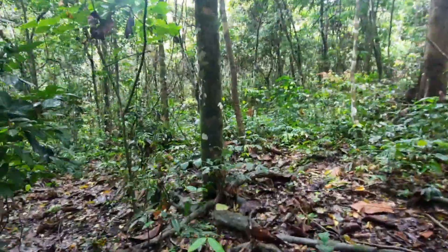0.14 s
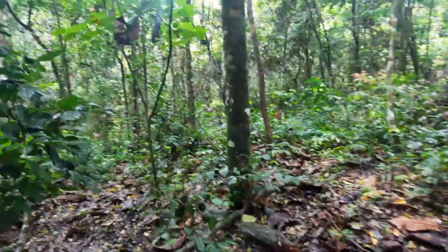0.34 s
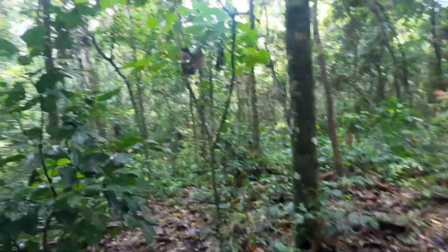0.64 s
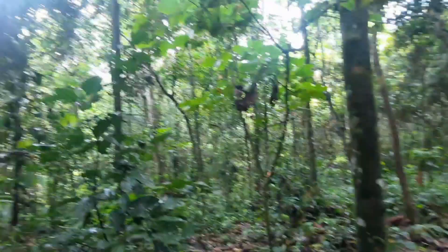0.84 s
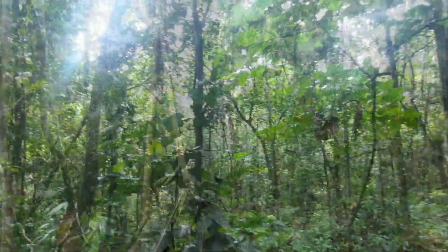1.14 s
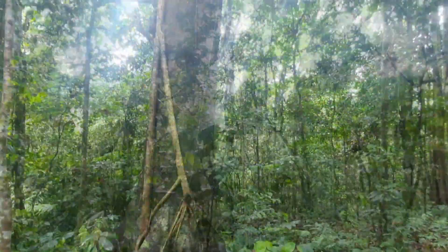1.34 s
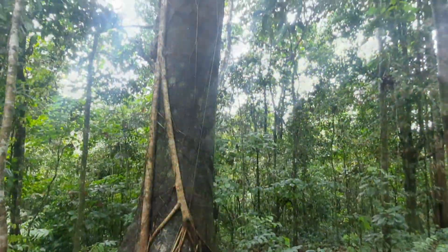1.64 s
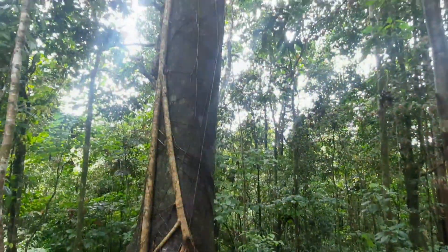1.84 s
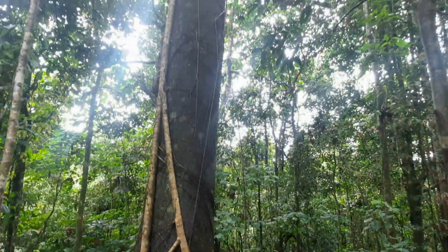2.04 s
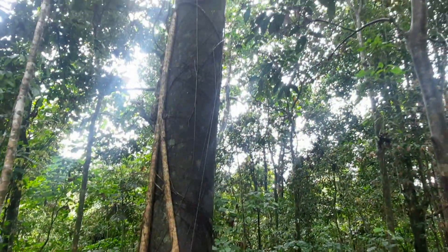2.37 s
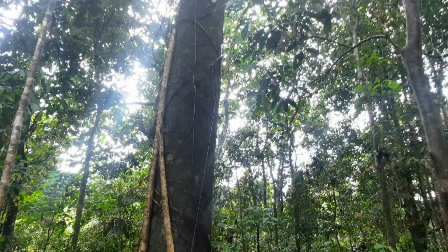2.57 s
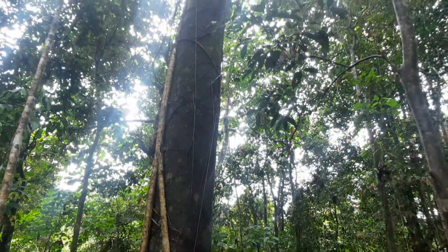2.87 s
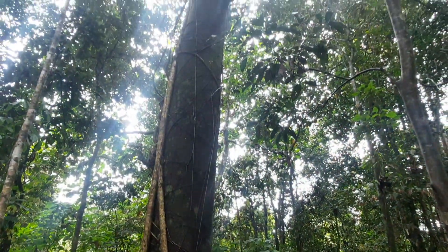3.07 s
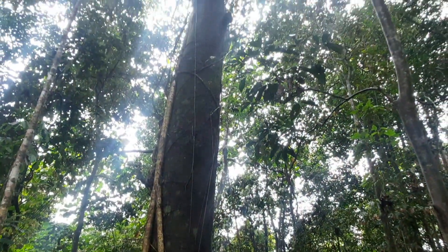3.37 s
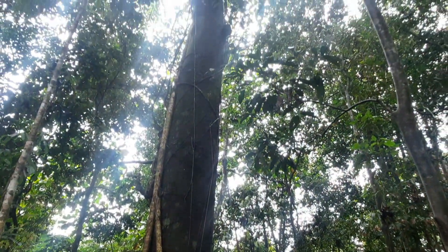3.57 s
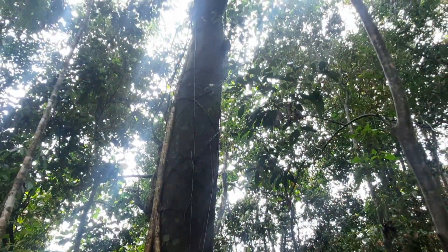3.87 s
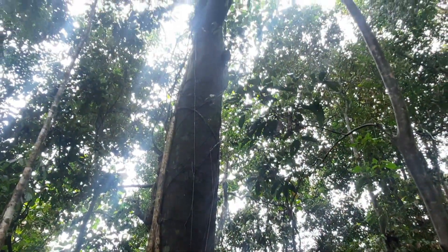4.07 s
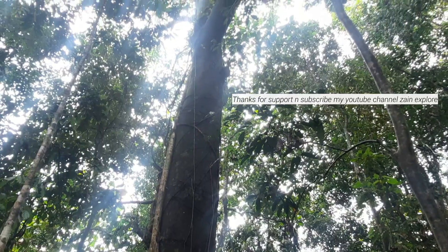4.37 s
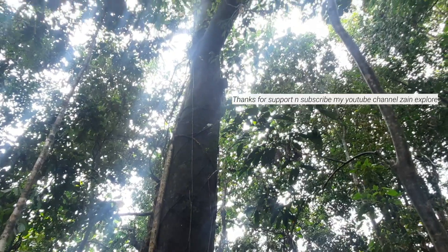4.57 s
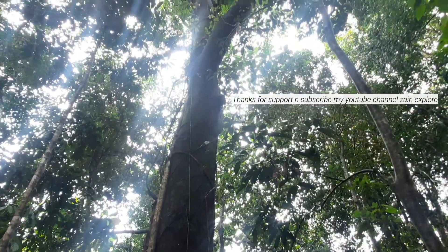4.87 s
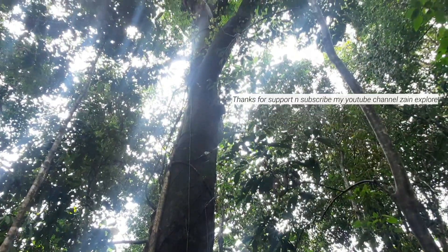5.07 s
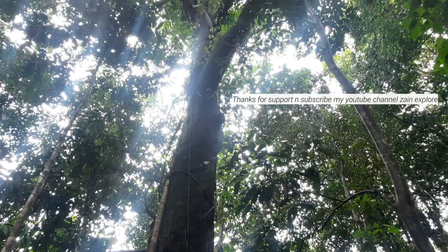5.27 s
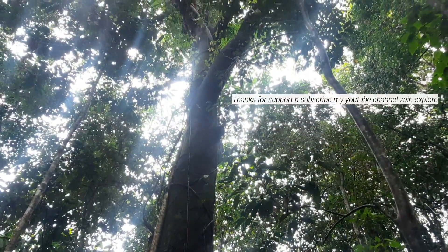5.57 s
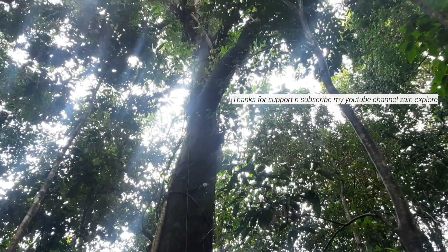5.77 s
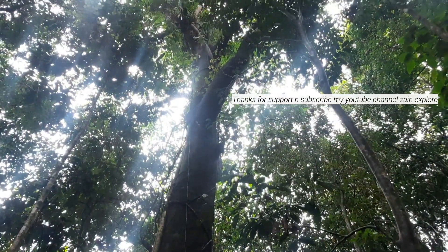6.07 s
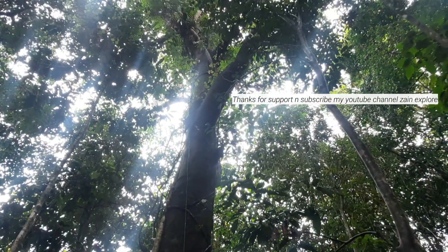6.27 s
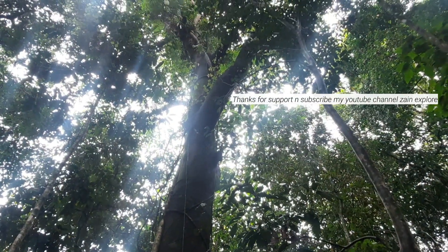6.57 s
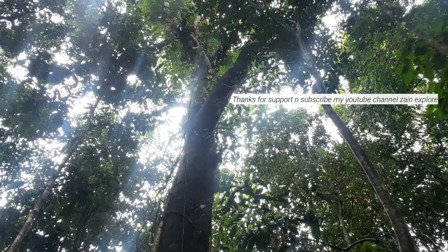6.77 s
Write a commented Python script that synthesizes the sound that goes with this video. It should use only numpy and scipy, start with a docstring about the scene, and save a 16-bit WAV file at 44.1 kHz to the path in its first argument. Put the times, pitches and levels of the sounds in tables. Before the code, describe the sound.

A dense tropical forest insect chorus fills both sides: a wavering whistle near 3 kHz, buzzing cicadas and a pulsing high sizzle. Steps crunch dry leaves close by in the first half second or so, then a hand bumps the left microphone with a dull, low thump and rub. The chorus dips for about a second and returns with a closer cicada on the right, over very faint ticks.

```python
"""A tropical forest drones from the start: a crowd of wavering sines whistles near 3 kHz, resonant noise makes
buzzing cicadas, and a high noise sizzle swells and ebbs over a faint rumble. In the first half second steps
crunch in the leaf litter as short bursts of grainy noise; near 1 s a hand bumps the left microphone, with clicks
ringing the case and low noise for the rub. The chorus dips for about a second while its balance shifts: the
nearest cicada comes forward on the right. The drone goes on with a few faint ticks in the undergrowth."""
import sys
import numpy as np
from scipy import signal
from scipy.fft import rfft, irfft, next_fast_len
from scipy.io import wavfile
from scipy.ndimage import uniform_filter1d

SR = 44100
rng = np.random.default_rng(int(sys.argv[2]) if len(sys.argv) > 2 else 0)


def dump(signal):
    """Clip the signal to [-1, 1] and save it as 16-bit WAV at the path in sys.argv[1]."""
    limited = np.clip(np.atleast_2d(signal).T, -1, 1)
    pcm = np.round(limited * 32767).astype(np.int16)
    wavfile.write(sys.argv[1], SR, pcm)


N = 304731
TIME = np.arange(N) / SR   # [s]

# Colour of the distant rumble: (frequency [Hz], relative density [dB per Hz])
AIR_SPECTRUM = [(25, -13), (60, -3.5), (120, 2), (210, -6), (350, 0.5), (520, -10.5), (900, -14),
                (1600, -20.5), (3000, -29.5)]
# Soft swells of the rumble: (crest time [s], width [s], level before the chorus swing [dB])
AIR_SWELLS = [(2.88, 0.18, -62), (3.7, 0.95, -65.5), (4.97, 0.23, -63.5), (5.35, 0.87, -67.5)]
# Colour of brushed leaves: (frequency [Hz], relative density [dB per Hz])
LEAF_SPECTRUM = [(50, -14), (130, -7.5), (210, -13), (320, 2), (550, -1.5), (800, -3.5), (1300, -3.5),
                 (2200, -5), (5000, -9), (11000, -14), (15000, -23.5)]
# Feet and clothes brushing the leaves: (time [s], length [s], level [dB])
BRUSHES = [(0.0, .025, -37), (0.17, 0.12, -48), (0.441, 0.14, -34), (0.603, 0.089, -33)]
# Footfalls and small stirrings in the litter: (time [s], level [dB], pitch [Hz], T60 decay [s])
TREADS = [(0.003, -37.5, 1030, 0.11), (0.168, -40, 800, 0.06), (0.238, -39, 377, 0.15),
          (0.364, -25, 422, 0.036), (0.385, -43, 160, 0.13), (0.474, -28.5, 374, .15),
          (0.487, -22.5, 383, 0.18), (0.5, -30.5, 890, 0.41), (0.534, -26, 506, 0.23),
          (0.679, -34, 910, 0.12), (0.898, -47, 544, 0.95), (1.071, -41.5, 994, 0.12),
          (2.697, -58, 1010, 0.23), (2.788, -53, 1160, 0.095), (3.167, -49, 1400, 0.096),
          (3.69, -52.5, 564, 0.19), (4.89, -53, 1420, 0.068), (4.983, -48, 1500, 0.13),
          (5.72, -59, 650, .08)]
# Hand knocks on the case: (time [s], relative force [dB], lowpass cut, lower is softer [Hz])
KNOCKS = [(0.949, -16.5, 251), (1.008, -7, 350), (1.019, 1, 303), (1.029, -2.5, 600), (1.044, -5, 456),
          (1.056, -8, 407.4), (1.086, -2, 230), (1.096, -1.5, 560), (1.109, -8.5, 307), (1.129, -10.5, 450),
          (1.201, -29, 150), (1.238, -30, 300), (1.303, -30, 300), (1.346, -27.5, 148)]
# Ringing modes of the case: (frequency [Hz], relative level [dB], T60 decay [s])
CASE_MODES = [(74, -14, 0.28), (134, -6.5, 0.04), (173, -4.5, 0.033), (273, -3.5, 0.036)]
# Colour of sliding skin: (frequency [Hz], relative density [dB per Hz])
RUB_SPECTRUM = [(20, -28.5), (45, -9.5), (85, 4.5), (130, -0.5), (220, -17), (450, -24.5), (800, -43),
                (2000, -75.5)]
# Colour of the sizzle in each ear: (frequency [Hz], relative density [dB per Hz])
SIZZLE_LEFT_SPECTRUM = [(7000, -35.5), (8500, -12), (9600, -6), (11300, 2), (12700, -6), (15000, -16)]
SIZZLE_RIGHT_SPECTRUM = [(8000, -30.5), (9800, -11.5), (10800, -4.5), (11700, 2), (13000, 0), (15000, -22)]
# Sizzle swells, about every 3/4 s: (crest time [s], width [s], level before the chorus swing [dB])
SIZZLE_SWELLS = [(0.1, .3, -41.5), (0.57, 0.34, -36.5), (1.0, .2, -40), (1.35, 0.26, -39.5),
                 (2.13, 0.28, -35), (2.84, 0.33, -35), (3.64, 0.64, -35.5), (4.501, 0.55, -36.5),
                 (5.28, 0.46, -35.5), (6.02, 0.34, -33.5), (6.73, 0.38, -33)]
# Colour of the blurred far insects: (frequency [Hz], relative density [dB per Hz])
FAR_INSECT_SPECTRUM = [(1000, -35), (1280, -26.5), (1500, -15.5), (1850, -13), (2080, -18.5), (2380, -4.5),
                       (2900, 1), (3900, -2), (6500, -2.5), (8000, -6.5), (11000, -6), (15000, -12.5)]
# Cicada song bands: (frequency [Hz], width before scaling [Hz], relative level [dB], left over right [dB])
CICADA_BANDS = [(2427, 88, -18, 2.5), (3618, 130, -18, 4.5), (4240, 100, -18.5, 0.5),
                (5384, 1810, -6.5, -7)]
# Lines of the nearest cicada: (frequency [Hz], width before scaling [Hz], relative level [dB])
NEAR_CICADA_LINES = [(5160, 12, -19), (5224, 8, -17), (5372, 12, -20), (5445, 30, -17), (5513, 9, -17),
                     (5598, 14, -18), (5680, 50, -12), (5762, 58, -4), (5830, 50, -9.5), (6093, 9, -21),
                     (6320, 10, -23)]
# Swing of the whole chorus, with its dip: (time [s], level change [dB])
CHORUS_LEVEL = [(0, -1.5), (0.62, -2), (0.98, -2.5), (1.17, -9.5), (1.65, -9.5), (2.0, -5), (2.45, -0.24),
                (3.25, -1), (4.0, -0.4), (5.3, -0.36), (6.91, -0.63)]

# Levels before the chorus swing
AIR_DB, SIZZLE_BED_DB = -69, -42.5   # between swells
WHISTLE_DB, CICADA_DB, NEAR_CICADA_DB = -25, -34, -32.5
WHISTLE_FOLLOWS, SIZZLE_FOLLOWS, AIR_FOLLOWS = 1, 0.85, 0.67   # shares of the chorus swing in dB

# The balance shifts: the nearest cicada comes forward and the sizzle moves toward the middle
SHIFT_START_S, SHIFT_END_S = 1.0, 1.9
NEAR_CICADA_BACK_DB = -8   # how much fainter it is before the shift
SIZZLE_BEFORE_SIDE_DB, SIZZLE_AFTER_SIDE_DB = 8.5, 1.5   # left over right

WHISTLE_HZ, WHISTLE_SPREAD_HZ, WHISTLE_WAVER_HZ = 3038, 28, 19   # centre, rms spread, rms waver

BRUSH_ATTACK_S, BRUSH_T60_S = 0.029, 0.18
STIR_DB, STIR_LENGTH_S, STIR_T60_S = -46, 1.16, 0.66   # faint stirring until the walker stands still
SETTLE_DB, SETTLE_LENGTH_S = -67, 1.84   # the leaves settle a little longer

# The hand presses on the case, slides ever more lightly and lets go
RUB_START_S, RUB_ATTACK_S, RUB_LENGTH_S, RUB_T60_S = 0.93, 0.025, 0.19, 0.56
RUB_DB = -20.5   # before the left-right split and low cut
LET_GO_S, LET_GO_T60_S = 1.4, 0.091


def from_db(db):
    """Decibels to gain."""
    return 10 ** (np.asarray(db) / 20)


def rms_one(x):
    """Scale to rms 1."""
    return x / np.sqrt(np.mean(x ** 2) + 1e-20)


def pan(side_db):
    """Left and right gains, side_db apart, with mean power 1."""
    return rms_one(from_db(np.array([[side_db], [-side_db]]) / 2))


def drift(rate):
    """Random wander with rms 1, joining chance values drawn rate times a second."""
    knots = rng.standard_normal(int(rate * N / SR) + 2)
    return rms_one(np.interp(TIME * rate, np.arange(len(knots)), knots))


def stereo_noise(alike):
    """White noise, of which the share alike (in power) is common to both ears."""
    common = rng.standard_normal(N)
    separate = rng.standard_normal((2, N))
    return np.sqrt(alike) * common + np.sqrt(1 - alike) * separate


def colour(x, spectrum):
    """Filter to a spectrum that falls away 12 dB per octave beyond its ends; rms 1."""
    size = next_fast_len(N)
    hz, db = np.transpose(spectrum)
    bins = np.maximum(np.arange(size // 2 + 1) * SR / size, 1)
    gain = from_db(np.interp(np.log(bins), np.log(hz), db))
    ends = np.minimum(1, np.minimum(bins / hz[0], hz[-1] / bins)) ** 2
    return rms_one(irfft(rfft(x, size) * gain * ends, size)[..., :N])


def resonate(x, hz, width):
    """A resonance with gain 1 on top, passed twice for steeper skirts."""
    r = np.exp(-np.pi * width / SR)
    top = np.array([1, 0, -1]) * (1 - r * r) / 2
    poles = [1, -2 * r * np.cos(2 * np.pi * hz / SR), r * r]
    return signal.lfilter(top, poles, signal.lfilter(top, poles, x))


def ring(x, hz, t60):
    """A unit click sets a decaying sine of about height 1 ringing."""
    r = np.exp(-np.log(1000) / (t60 * SR))
    w = 2 * np.pi * hz / SR
    return signal.lfilter([0, np.sin(w)], [1, -2 * r * np.cos(w), r * r], x + 1e-18)


def stroke(start, attack, length, t60):
    """An envelope that rises, holds until its length (attack included) is over and dies away."""
    age = TIME - start
    decay = np.exp(-np.log(1000) * np.clip((age - length) / t60, 0, 10))
    return np.clip(age / attack, 0, 1) * decay


def swell(crest, width, db):
    """Power of a bell-shaped swell, with its width taken at half power."""
    return from_db(db) ** 2 * 0.5 ** np.minimum((2 * (TIME - crest) / width) ** 2, 40)


def air():
    """Low coloured noise makes a faint, distant rumble with a few soft swells."""
    power = from_db(AIR_DB) ** 2 + sum(swell(*row) for row in AIR_SWELLS)
    return np.sqrt(power) * colour(stereo_noise(0.7), AIR_SPECTRUM) * pan(1.5)


def leaf_brushes(grain_db=3):
    """Dry leaves rub and crackle: grainy noise follows the motion of feet and clothes."""
    # the stirring is already under way at time 0
    motion = from_db(STIR_DB) * stroke(-BRUSH_ATTACK_S, BRUSH_ATTACK_S, STIR_LENGTH_S, STIR_T60_S)
    motion += from_db(SETTLE_DB) * stroke(0, BRUSH_ATTACK_S, SETTLE_LENGTH_S, STIR_T60_S)
    for start, length, db in BRUSHES:
        brush = from_db(db) * stroke(start, BRUSH_ATTACK_S, length, BRUSH_T60_S)
        motion = np.hypot(motion, brush)
    crackle = stereo_noise(0.6) * from_db(grain_db * drift(500))
    return colour(crackle, LEAF_SPECTRUM) * motion * pan(4.6)


def treads(grain_db=2):
    """Each footfall or stirring crushes leaves: a short burst of grainy noise with a broad pitch."""
    out = np.zeros((2, N))
    push = stereo_noise(1.0) * from_db(grain_db * drift(300))
    for start, db, hz, t60 in TREADS:
        crunch = rms_one(resonate(push, hz, 0.75 * hz))
        out += from_db(db) * stroke(start, 0.0018, 0, t60) * crunch * pan(2.5)
    return out


def case_knocks():
    """Softened clicks from the hand strike the case and ring its modes."""
    force = np.zeros(N)
    for start, db, cut_hz in KNOCKS:
        click = np.full(N, 1e-18)
        click[round(start * SR)] = from_db(db)
        force += signal.sosfilt(signal.butter(2, cut_hz, fs=SR, output="sos"), click)
    return sum(from_db(db) * ring(force, hz, t60) for hz, db, t60 in CASE_MODES)


def skin_rub():
    """Sliding skin makes low friction noise that follows its pressure and fades fast on letting go."""
    pressure = stroke(RUB_START_S, RUB_ATTACK_S, RUB_LENGTH_S, RUB_T60_S)
    touching = from_db(-60 * np.clip((TIME - LET_GO_S) / LET_GO_T60_S, 0, 2))
    friction = colour(rng.standard_normal((2, N)), RUB_SPECTRUM)
    return from_db(RUB_DB) * pressure * touching * friction


def hand_bump():
    """Knocks and rub reach almost only the left microphone, with the deepest bass cut."""
    thump = case_knocks() * from_db([[0], [-42]]) + skin_rub() * from_db([[0], [-23]])
    return signal.sosfilt(signal.butter(4, 50, "high", fs=SR, output="sos"), thump)


def sizzle(shifted):
    """Bush crickets rasp high up in regular swells; each microphone port colours the noise differently."""
    left, right = stereo_noise(0.013)
    rasp = np.array([colour(left, SIZZLE_LEFT_SPECTRUM), colour(right, SIZZLE_RIGHT_SPECTRUM)])
    power = from_db(SIZZLE_BED_DB) ** 2 + sum(swell(*row) for row in SIZZLE_SWELLS)
    side_db = SIZZLE_BEFORE_SIDE_DB * (1 - shifted) + SIZZLE_AFTER_SIDE_DB * shifted
    return np.sqrt(power) * rasp * from_db(np.array([side_db, -side_db]) / 2)


def cicadas(flutter_db=1.02):
    """Countless tymbal clicks merge into a fluttering buzz in each kind's resonance, over the far crowd."""
    out = from_db(-0.5) * colour(stereo_noise(0.03), FAR_INSECT_SPECTRUM)
    for hz, width, db, side_db in CICADA_BANDS:
        song = rms_one(resonate(stereo_noise(0.02), hz, 1.1 * width))
        out += song * from_db(db + 4.5 + flutter_db * drift(90)) * pan(side_db)
    return out


def near_cicada(shifted, flutter_db=0.5):
    """The nearest cicada buzzes shrilly on the right: narrow noise bands with thin lines beside them."""
    song = np.zeros((2, N))
    for hz, width, db in NEAR_CICADA_LINES:
        song += from_db(db) * rms_one(resonate(stereo_noise(0.025), hz, 1.7 * width))
    level_db = NEAR_CICADA_DB + NEAR_CICADA_BACK_DB * (1 - shifted) + flutter_db * drift(90)
    return song * from_db(level_db) * pan(-6)


def whistlers(count=12):
    """Near-pure songs waver round one pitch and beat; the trees bring each ear its own mixture."""
    ears = np.zeros((2, N))
    for ear in ears:
        for offset in rms_one(np.linspace(-1, 1, count)):
            hz = WHISTLE_HZ + WHISTLE_SPREAD_HZ * offset + WHISTLE_WAVER_HZ * drift(40)
            ear += np.sin(2 * np.pi * (np.cumsum(hz) / SR + rng.random()))
    # fast flutter stays; slower swings of loudness are halved in dB
    loudness = np.sqrt(uniform_filter1d(ears ** 2, size=SR // 4))
    return rms_one(ears / np.sqrt(loudness)) * pan(0.7)


def scene():
    """Insects all round, a faint rumble of air, and the walker close by."""
    chorus_db = np.interp(TIME, *np.transpose(CHORUS_LEVEL))
    shifted = np.interp(TIME, [SHIFT_START_S, SHIFT_END_S], [0, 1])
    background = from_db(AIR_FOLLOWS * chorus_db) * air()
    walker = leaf_brushes() + treads() + hand_bump()
    insects = from_db(SIZZLE_FOLLOWS * chorus_db) * sizzle(shifted)
    insects += from_db(chorus_db) * (from_db(CICADA_DB) * cicadas() + near_cicada(shifted))
    insects += from_db(WHISTLE_DB + WHISTLE_FOLLOWS * chorus_db) * whistlers()
    return background + walker + insects


def record(dry):
    """The highest peaks are rounded and the top is cut steeply above 15.3 kHz."""
    rounded = dry / (1 + (dry / 0.9) ** 4) ** 0.25
    return signal.sosfilt(signal.ellip(12, 0.1, 80, 15300, fs=SR, output="sos"), rounded)


dry = scene()
out = record(dry)
dump(out)
```